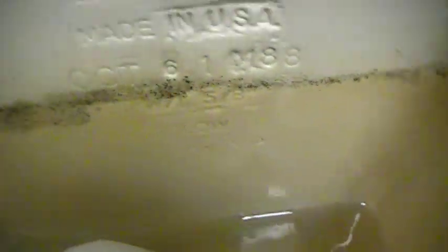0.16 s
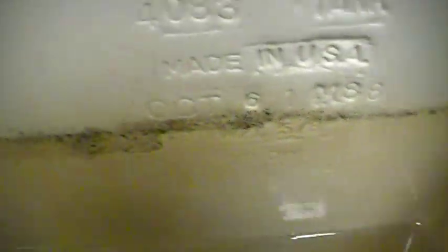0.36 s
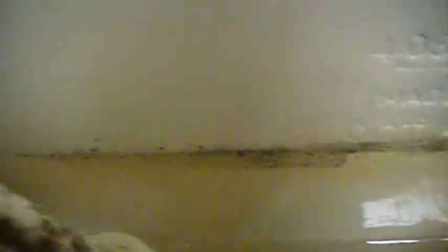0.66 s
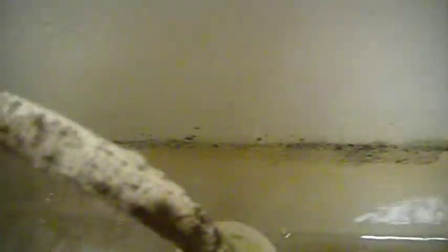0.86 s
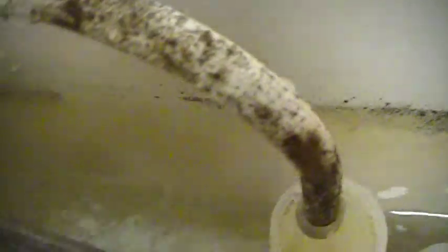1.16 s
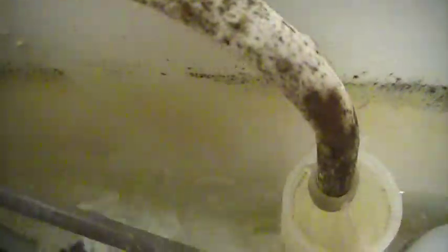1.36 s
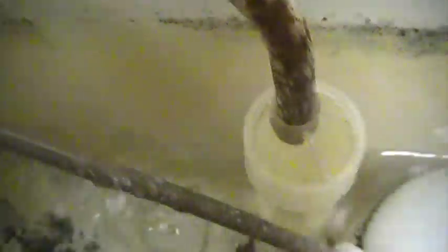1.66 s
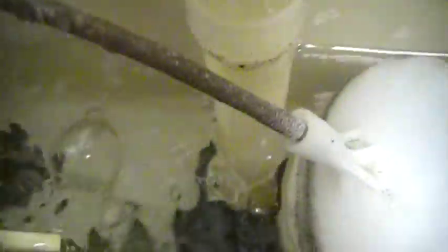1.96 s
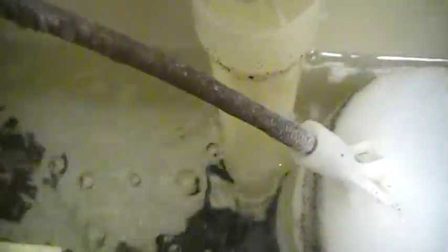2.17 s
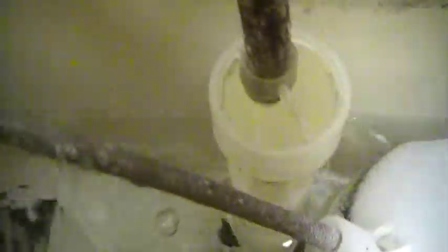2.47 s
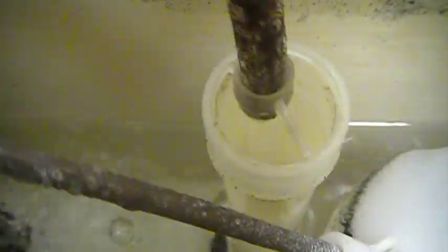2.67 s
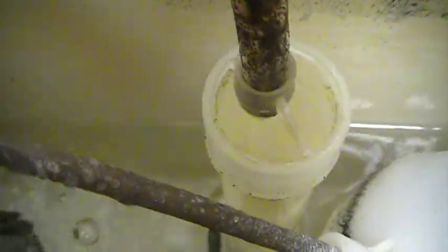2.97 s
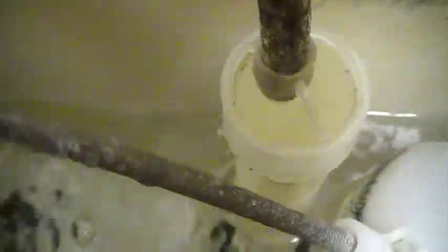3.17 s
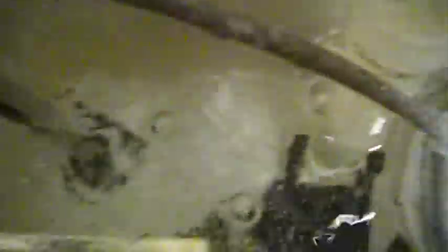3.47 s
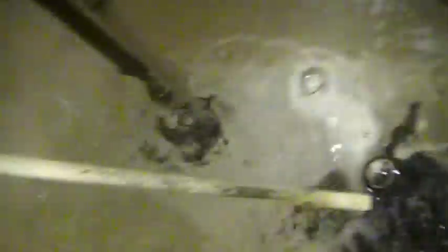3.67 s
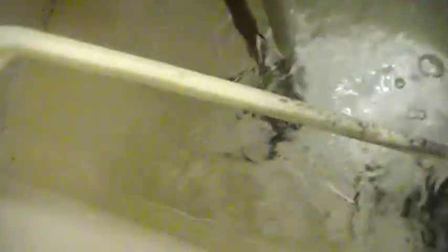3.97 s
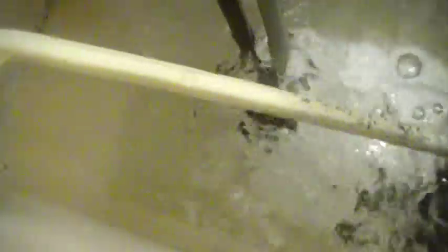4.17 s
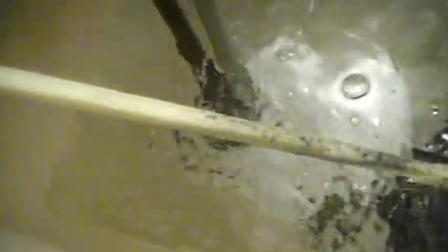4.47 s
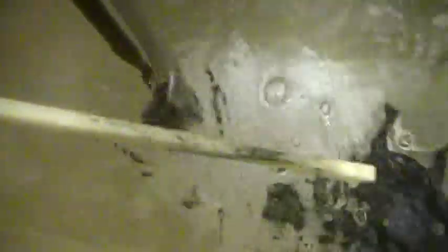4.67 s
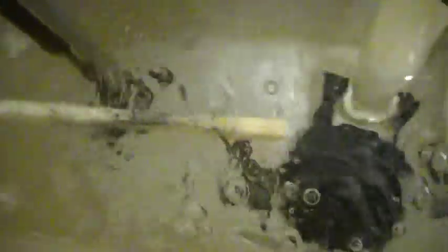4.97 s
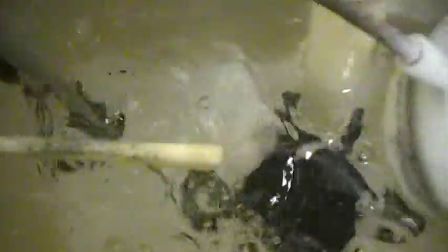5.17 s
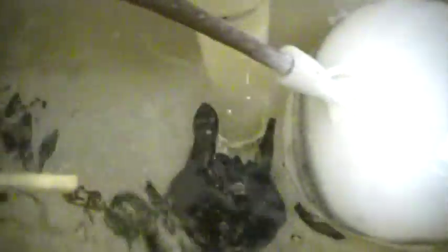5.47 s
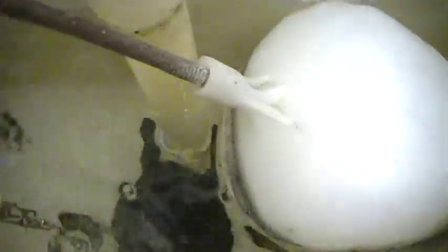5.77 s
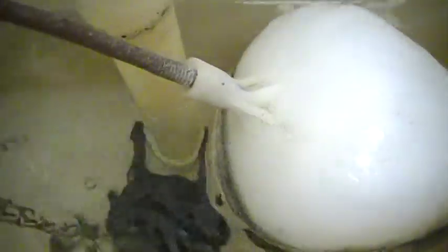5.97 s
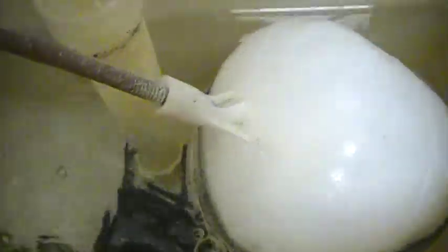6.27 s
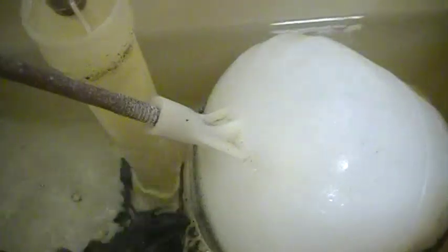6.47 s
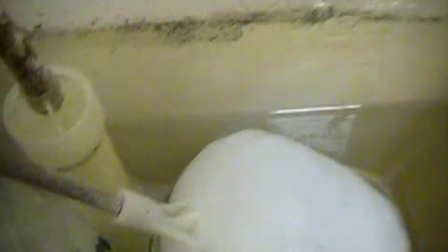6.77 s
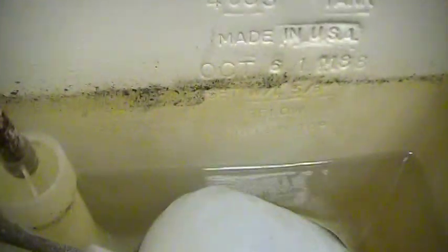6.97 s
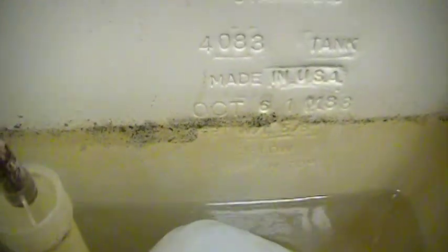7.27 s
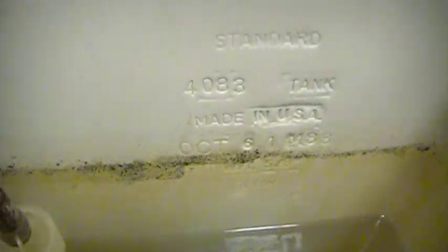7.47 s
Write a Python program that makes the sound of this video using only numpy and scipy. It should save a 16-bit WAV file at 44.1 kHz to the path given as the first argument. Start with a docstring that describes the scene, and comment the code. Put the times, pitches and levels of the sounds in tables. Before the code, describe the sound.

Inside an open toilet tank, water refills in a continuous, resonant rush, coloured by the hard porcelain walls into a ringing, almost whistling midrange. Bright spray hisses and spatters over it, with irregular sharp droplet snaps and occasional rounded gulps. A hand-held microphone moves close above the water from one end past the overflow pipe to the inlet and float, so the tone shifts throughout. The fill never stops.

```python
"""Inside an open toilet cistern: it refills with the lid off as a hand-held microphone moves above the water.
The inflow roars: noise drives the standing waves of the porcelain tank, over a broad wash.
Spray hisses at the valve: ringing droplets, flickering hiss and splats, combed by a near reflection
and wall echoes. Gulps are decaying sines that climb in pitch. Snaps are short treble bursts with
a noisy tail, and the loudest make the gain control duck."""
import sys
import numpy as np
from scipy import signal
from scipy.fft import rfft, irfft, next_fast_len
from scipy.io import wavfile
from scipy.ndimage import map_coordinates

SR = 44100
rng = np.random.default_rng(int(sys.argv[2]) if len(sys.argv) > 2 else 0)


def invert_db(x):
    """Field ratio 10**(x/20) for x, a level in decibels (scalar or array-like)."""
    u = np.asarray(x, float) / 20
    return 10 ** u


def waveform_to_disk(signal):
    """Save audio, clipped to [-1, 1], as 16-bit WAV at the path in sys.argv[1]."""
    frames = np.transpose(np.atleast_2d(signal))
    scaled = np.clip(frames, -1, 1) * 32767
    samples = np.round(scaled).astype(np.int16)
    wavfile.write(sys.argv[1], SR, samples)


N = 336042

# microphone travel over the tank: (time [s], place [0 left end, 1 overflow pipe, 2 inlet, 3 float])
# places below 0 sound like the left end
MIC_PLACE = [(0, -0.5), (1., 0.4), (1.8, 1.), (3.3, 1.06), (3.85, 2.), (4.45, 2.), (5.1, 3), (7.62, 3.)]
# standing waves of tank, pipes and room, before the nearness gain:
# (centre [Hz], nominal width [Hz], level at place 0 [dB], at 1 [dB], at 2 [dB], at 3 [dB])
TANK_MODES = [(61.5, 10, -79, -78, -72, -71), (96, 17, -72, -70, -66, -65.5),
              (157, 110, -64, -64, -55.5, -76), (256.4, 20.5, -51, -52.5, -51.5, -58),
              (345, 28, -43, -43.5, -46, -46.5), (420, 51, -55.5, -51, -46, -50),
              (537, 41, -52, -78, -52.5, -62), (654.6, 39, -72, -74, -50.5, -50.5),
              (760, 140, -64, -80, -51, -70), (903, 59.5, -38.5, -30, -49.5, -37),
              (1120.6, 25.5, -30, -23, -44, -31.5), (1185.8, 45, -29.5, -31, -25, -30),
              (1243, 48, -30.5, -32, -20, -28), (1402, 26, -40.5, -40.5, -45, -42.5),
              (1592, 34, -49, -43, -39, -39.5), (1722, 125, -57, -37.5, -34, -33.5),
              (1969.5, 52, -38.5, -37, -22.5, -27.5), (2075, 83, -34.5, -32, -29, -31),
              (2304, 49, -31.5, -28.5, -26, -27), (2454, 120, -24.5, -25, -27.5, -31),
              (2641, 93, -30.5, -29.5, -34.5, -29.5), (2840, 130, -36, -35.5, -37, -43.5),
              (2985, 51, -39, -36, -36.5, -37.5), (3247, 210, -35.5, -39.5, -28.5, -34.5),
              (3545, 210, -40.5, -38.5, -37, -37), (3801, 66, -41, -40, -39.5, -38.5),
              (4493, 72, -42.5, -54, -43.5, -41.5)]
# loudness at the microphone: (time [s], gain on the roar [dB], spray level [dB])
NEARNESS_CURVE = [(0, 4, -19.5), (.35, -0.5, -23), (.7, -3.5, -23), (1.3, -0.5, -20), (2.2, 2, -24),
                  (2.9, -1, -21.5), (3.5, 2.5, -22.5), (4.1, -0.5, -25), (4.9, 2, -22), (5.7, 2.5, -24),
                  (6.5, 3.5, -23), (7.62, -1, -20.5)]
# spectral tilt of the spray before its reflections: (frequency [Hz], relative level per Hz [dB])
SPRAY_TONE = [(2060, -32), (3500, -3.5), (4180, -7.5), (4570, -8.5), (5490, -6), (7970, -4.5), (9890, -1.5),
              (11200, 0), (14100, -5.5), (15900, -15)]
# broad noise under the standing waves: (frequency [Hz], relative level per Hz [dB])
WASH_TONE = [(18, -77), (30, -60), (161, -19), (336, -5.5), (506, -26), (731, -53), (879, -25), (1040, 2),
             (1150, -26), (1500, -5), (1950, 8.5), (2350, 0), (4000, -35), (5200, -46), (8800, -120)]
WASH_DB = -28.5  # rms, before the nearness gain
# loudest snaps of the spray: (time [s], burst level before the gain control [dB], centre [Hz])
SNAP_EVENTS = [(0.147, 0.5, 10160), (0.273, -4.5, 10400), (0.4625, 1, 11200), (0.4867, -1, 11050),
               (0.7764, -2, 12150), (1.1578, 4, 11000), (1.2311, 5.5, 11060), (1.695, 1, 9660),
               (1.7995, -4, 10800), (1.984, -1.5, 7250), (2.3231, -2.5, 10100), (2.4415, -3.5, 11500),
               (2.682, -12, 4800), (2.7092, 1, 11800), (2.739, 1.5, 11400), (2.8901, 1, 9300),
               (3.231, -7.5, 3500), (3.24, 1.5, 11800), (3.4011, -6, 11700), (4.063, -1, 9130),
               (5.088, -6, 7300), (5.41, 4.5, 15100), (6.1918, -2.5, 9960), (6.2703, -1, 11130),
               (6.3824, -5, 10250), (6.503, 0.5, 11800), (6.8286, -0.5, 11500), (7.0893, -10.5, 4500),
               (7.232, -10.5, 4600), (7.2584, 1, 10100), (7.3243, -5, 11300), (7.566, -9, 4500)]
# large bubbles: (time [s], level [dB], starting pitch [Hz])
GULP_EVENTS = [(.12, -32, 880), (1.379, -13, 764), (1.468, -20, 894), (1.529, -19, 838), (2.205, -33, 410),
               (2.237, -22.5, 403), (2.587, -38, 654), (2.831, -33, 420), (3.397, -28.5, 363),
               (3.474, -22.5, 339), (4.499, -25.5, 379), (4.69, -34, 740), (4.954, -16.5, 344),
               (4.953, -27, 642), (4.994, -27, 760), (5.054, -18, 813), (5.969, -30, 345)]
# close reflection that combs the spray: (time [s], extra path [mm])
REFLECTION_PATH = [(0, 37), (.4, 46), (.7, 56.4), (1.6, 54), (1.95, 28), (2.25, 35), (2.45, 47.4),
                   (3.25, 51), (3.55, 21.6), (3.9, 26.4), (5.2, 27), (5.6, 39), (6.55, 43.6), (6.75, 54),
                   (7.62, 53)]
# echoes of the spray off the tank walls, about which they drift: (level [dB], lag [ms])
WALL_ECHOES = [(-14, 0.431), (-20.5, 1.015), (-10, 1.4), (-10, 2.1), (-23, 2.7), (-12, 3.3), (-32, 4.1),
               (-21, 7.3)]


def rms_one(x):
    """Scale to rms 1."""
    return x / np.sqrt(np.mean(x ** 2) + 1e-20)


def in_time(rows):
    """Draw each column of a time table as a curve, one value a sample."""
    s, *columns = np.transpose(rows)
    return [np.interp(np.arange(N) / SR, s, column) for column in columns]


def drift(rate_hz):
    """Slow random wander of rms 1: coarse noise twice through a one-pole low-pass."""
    r = np.exp(-2 * np.pi * rate_hz * 20 / SR)  # one coarse value every 20 samples
    noise = rng.standard_normal(N // 20 + 2002)
    slow = signal.lfilter([1], [1, -2 * r, r * r], noise)[2000:]  # skip the filter's start-up
    return np.interp(np.arange(N) / 20, np.arange(len(slow)), rms_one(slow))


def resonance(x, hz, width_hz):
    """Two-pole resonance with a gain of about 1 at its top."""
    r = np.exp(-np.pi * width_hz / SR)
    poles = [1, -2 * r * np.cos(2 * np.pi * hz / SR), r * r]
    return signal.lfilter([(1 - r * r) / 2, 0, (r * r - 1) / 2], poles, x)


def coloured(x, spectrum):
    """Filter x by a smooth curve through (frequency [Hz], gain [dB]) points."""
    size = next_fast_len(N)
    hz, level_db = np.transpose(spectrum)
    bins_hz = np.arange(size // 2 + 1) * SR / size
    shape = np.interp(np.log(bins_hz + 1), np.log(hz), level_db)
    return irfft(rfft(x, size) * invert_db(shape), size)[:N]


def roar(place, churn_db, own_db):
    """Churning water drives every standing wave; each one's strength depends on where one listens."""
    modes = np.zeros(N)
    churn = invert_db(churn_db * drift(13))
    for hz, width_hz, *levels_db in TANK_MODES:
        # twice through the resonance: steep skirts leave dark valleys between the modes
        once = resonance(rng.standard_normal(N), hz, 1.43 * width_hz)
        mode = resonance(once, hz, 1.43 * width_hz)
        heard_db = np.interp(place, np.arange(len(levels_db)), levels_db)
        modes += rms_one(mode) * invert_db(heard_db + own_db * drift(6.8))
    wash = invert_db(WASH_DB) * rms_one(coloured(rng.standard_normal(N), WASH_TONE))
    return (modes + wash) * churn


def spray(per_s, size_spread_db, cycles, hiss_db, shared_db, own_db, splat_db):
    """Clumped droplets ring across the treble over flickering hiss and splats; rms 1."""
    clump = drift(30)
    size_db = size_spread_db * np.minimum(rng.exponential(1, N), 2.6)
    sizes = invert_db(size_db) * rng.choice([-1, 1], N)
    falls = rng.random(N) < per_s * invert_db(3 * clump) / SR
    drops = rms_one(sizes * falls)
    pitches_hz, dealt = np.geomspace(3200, 15500, 16), rng.integers(0, 16, N)
    ringing = np.zeros(N)
    for k, hz in enumerate(pitches_hz):
        # each pitch region has its own drops and its own patchy hiss
        hiss = invert_db(hiss_db + shared_db * clump + own_db * drift(39)) * rng.standard_normal(N)
        struck_once = resonance(4 * drops * (dealt == k) + 1e-18, hz, hz / cycles)
        ringing += resonance(struck_once, hz, hz / cycles) + resonance(hiss, hz, hz / 8)
    # splats: broad bursts of noise that die in a few milliseconds
    strength = invert_db(3.5 * np.minimum(rng.exponential(1, N), 1.8))
    struck = (rng.random(N) < 70 / SR) * strength  # about 70 a second
    decay = signal.lfilter([1], [1, -np.exp(-1 / (0.0036 * SR))], struck + 1e-18)
    splats = decay * rng.standard_normal(N)
    mixed = rms_one(ringing) + invert_db(splat_db) * rms_one(splats)
    return rms_one(coloured(mixed, SPRAY_TONE))


def delayed(x, lag_s):
    """Read x later by a lag that may change."""
    return map_coordinates(x, [np.arange(N) - lag_s * SR], order=3)


def reflected(x, wall_cut_hz, tremor, fading_db):
    """Near surfaces comb the spray; the shaky hand shifts the lags and strengths of the wall echoes."""
    path_mm, = in_time(REFLECTION_PATH)
    combed = x - invert_db(-10) * delayed(x, path_mm / 343000)  # opposite sign; sound speed in mm/s
    dull = signal.sosfilt(signal.butter(2, wall_cut_hz, fs=SR, output="sos"), combed)
    out = combed.copy()
    for db, lag_ms in WALL_ECHOES:
        strength = invert_db(db + fading_db * drift(0.1))
        lag_s = lag_ms / 1000 * (1 + tremor * drift(0.83))
        out += strength * delayed(dull, lag_s)
    return out


def bubble(out_size, start_hz, rise, t60):
    """A dull push, then a decaying sine that climbs (octaves/s) as the bubble nears the surface."""
    t = np.arange(out_size) / SR
    phase = 2 * np.pi * np.cumsum(start_hz * 2 ** (rise * t)) / SR
    push = 0.11 * np.sin(0.646 * phase) * np.exp(-t / 0.01)
    ring = np.sin(phase) * invert_db(-60 * t / t60) * (1 - np.exp(-t / 0.00036))
    return push + ring


def gulps(small_db):
    """Air bubbles ring at the surface: large ones at set moments, 60 small ones at random."""
    out, size = np.zeros(N + SR), SR // 4
    bubbles = []
    for s, db, hz in GULP_EVENTS:
        rise = 2.7 * (hz / 800) ** 2  # octaves/s: higher-pitched, smaller bubbles climb faster
        bubbles.append((s, db, hz, rise, 0.14))  # all the large ones ring equally long
    for when, loud, pitch, climb, ring in rng.random((60, 5)):
        hz = 250 * 2 ** (2 * pitch)
        bubbles.append((when * N / SR, small_db + 12 * loud, hz, 5 * climb, 0.021 + 0.029 * ring))
    for s, db, hz, rise, t60 in bubbles:
        start = round(s * SR)
        out[start:start + size] += invert_db(db) * bubble(size, hz, rise, t60)
    return out[:N]


def snaps(cycles, tail_db, tail_s):
    """Each snap is a sharp burst of a few cycles with a short, decaying spatter of noise."""
    out, t = np.zeros(N + SR), np.arange(SR // 50) / SR
    spatter = rng.standard_normal((len(SNAP_EVENTS), len(t)))
    for (s, level_db, hz), noise in zip(SNAP_EVENTS, spatter):
        turns = hz * t / cycles
        burst = np.sin(2 * np.pi * hz * t) * turns * np.exp(1 - turns)
        tail = invert_db(tail_db) * rms_one(resonance(noise, hz, .5 * hz)) * np.exp(-t / tail_s)
        start = round(s * SR)
        out[start:start + len(t)] += invert_db(level_db) * (burst + tail)
    high_pass = signal.butter(2, 2500, "high", fs=SR, output="sos")
    return signal.sosfilt(high_pass, out[:N] + 1e-18)


def scene():
    """Mix the roar, the spray with its reflections, the bubbles and the snaps."""
    place, = in_time(MIC_PLACE)
    roar_db, spray_db = in_time(NEARNESS_CURVE)
    water = invert_db(roar_db) * roar(place, churn_db=.5, own_db=2.0)
    jet = spray(per_s=800., size_spread_db=6.0, cycles=8.3, hiss_db=-4.5,
                shared_db=1.5, own_db=2.5, splat_db=-4.5)
    jet = reflected(jet, wall_cut_hz=10200, tremor=0.0416, fading_db=0.5)
    jet = invert_db(spray_db) * rms_one(jet)
    air = gulps(small_db=-55.0)
    clicks = snaps(cycles=2.13, tail_db=-10, tail_s=0.0017)
    return (water + jet + air + clicks)[None]


def top_cut(x):
    """Nothing passes above the cut-off."""
    return signal.sosfilt(signal.butter(12, 16050, fs=SR, output="sos"), x)


def record(dry):
    """Peaks over the limit duck the gain, which climbs back; deep bass and top treble are lost."""
    limit_db, recovery_db_per_s = -2.5, 28
    attack_s, ceiling = .0003, .76
    climb_db = recovery_db_per_s * np.arange(N) / SR
    over_db = np.maximum(20 * np.log10(np.abs(dry[0]) + 1e-9) - limit_db, 0)
    cut_db = np.maximum.accumulate(over_db + climb_db) - climb_db
    # the gain starts to fall just ahead of the peak, so the peak itself is tamed
    r, ahead = np.exp(-1 / (attack_s * SR)), round(attack_s * SR / 2)
    early_db = np.pad(cut_db[ahead:], (0, ahead), "edge")
    smooth_db = signal.lfilter([1 - r], [1, -r], early_db)
    held = np.clip(dry * invert_db(-smooth_db), -ceiling, ceiling)
    held = signal.sosfilt(signal.butter(3, 60, "high", fs=SR, output="sos"), held)
    held = signal.sosfilt(signal.cheby2(10, 60, 17000, fs=SR, output="sos"), held)  # 60 dB down at 17 kHz
    return top_cut(held)


dry = scene()
out = record(dry)
waveform_to_disk(out)
```